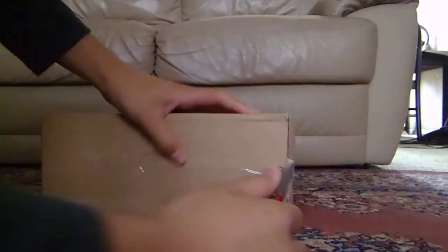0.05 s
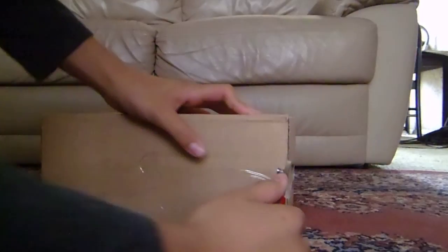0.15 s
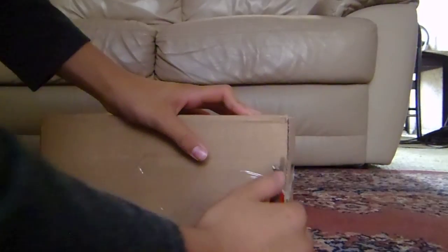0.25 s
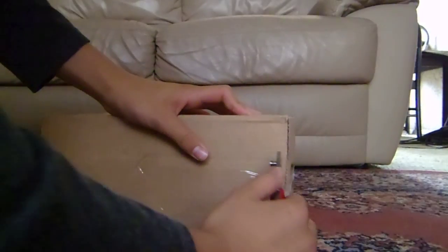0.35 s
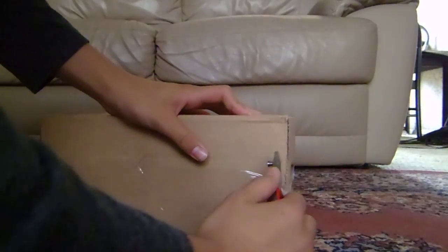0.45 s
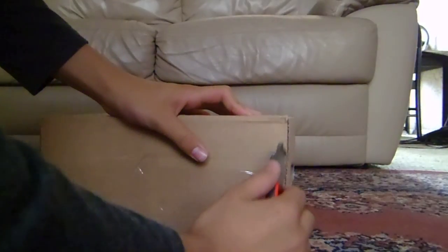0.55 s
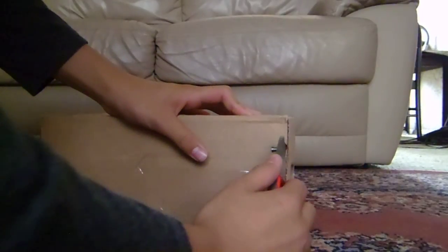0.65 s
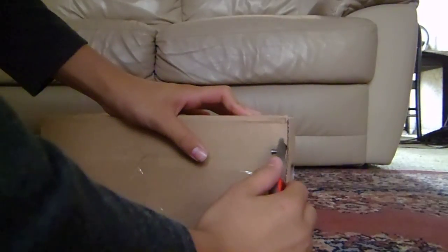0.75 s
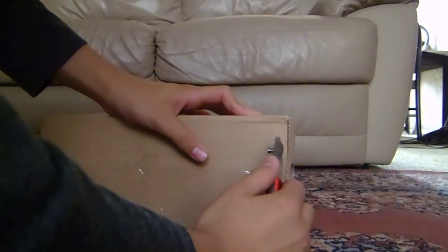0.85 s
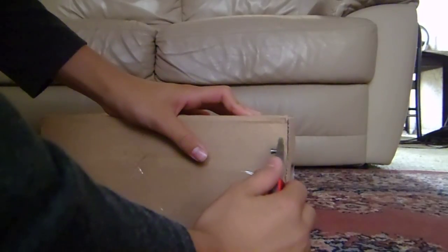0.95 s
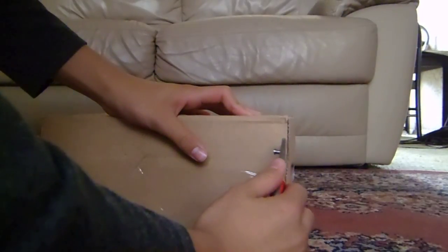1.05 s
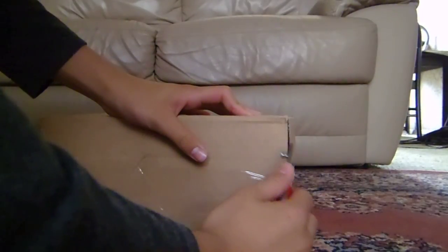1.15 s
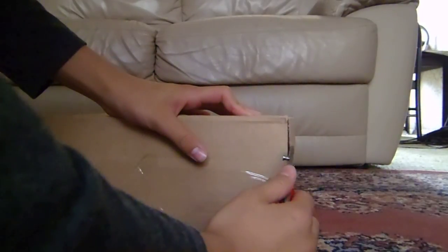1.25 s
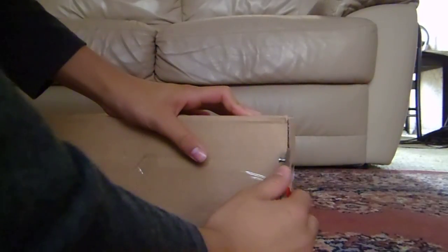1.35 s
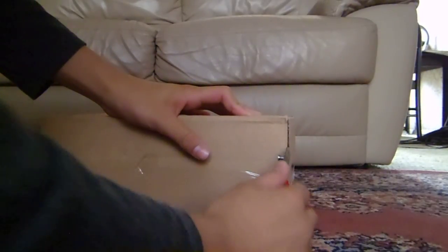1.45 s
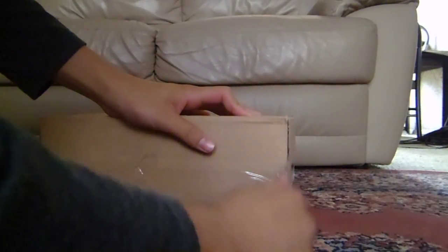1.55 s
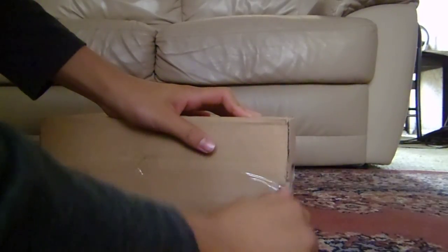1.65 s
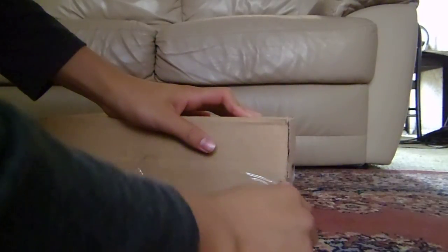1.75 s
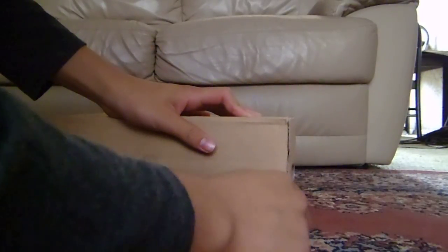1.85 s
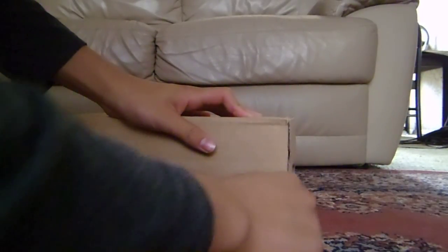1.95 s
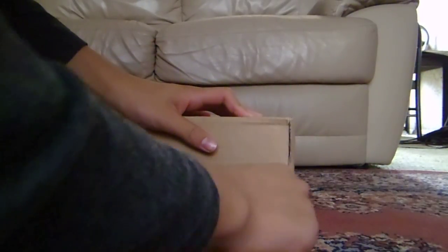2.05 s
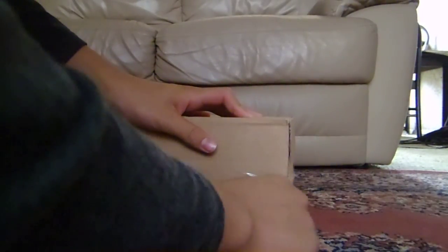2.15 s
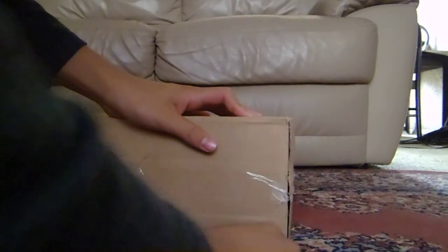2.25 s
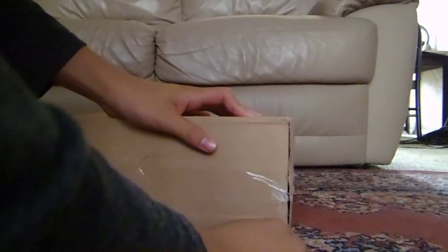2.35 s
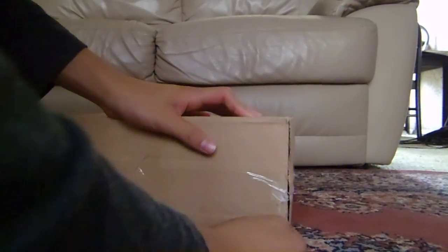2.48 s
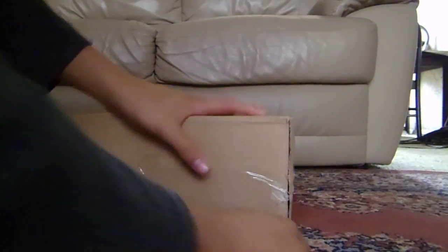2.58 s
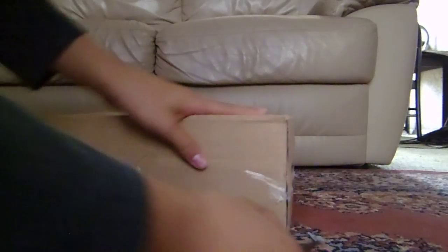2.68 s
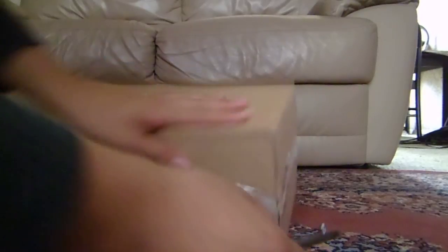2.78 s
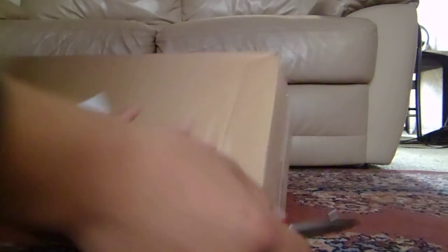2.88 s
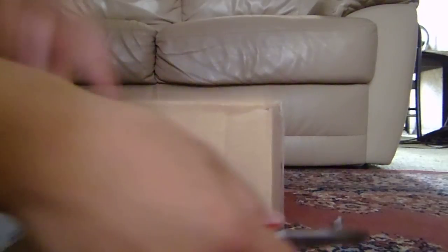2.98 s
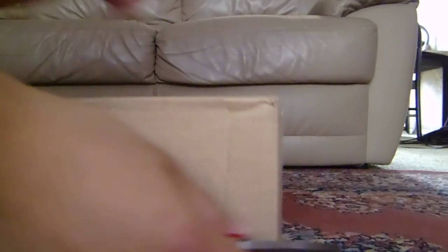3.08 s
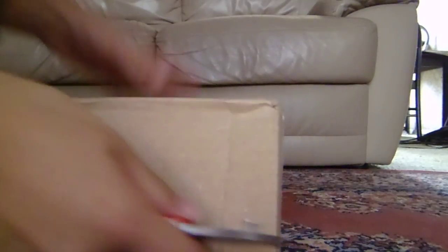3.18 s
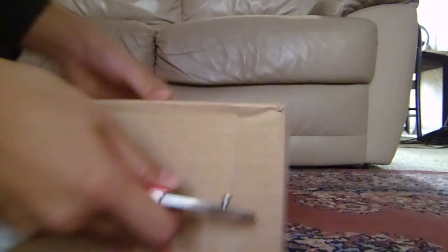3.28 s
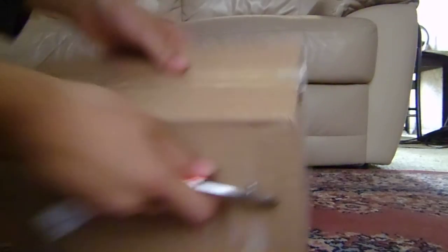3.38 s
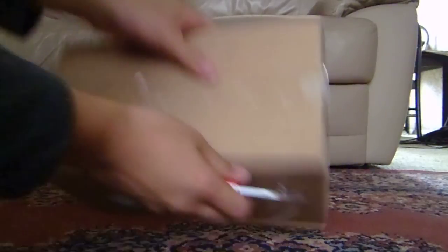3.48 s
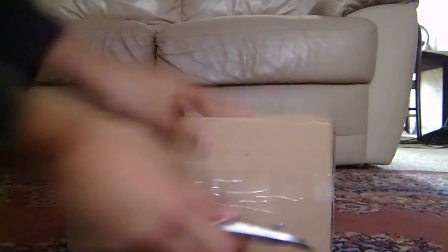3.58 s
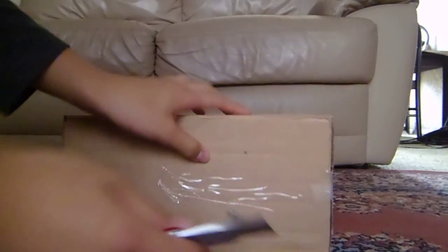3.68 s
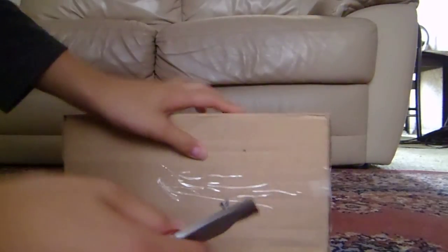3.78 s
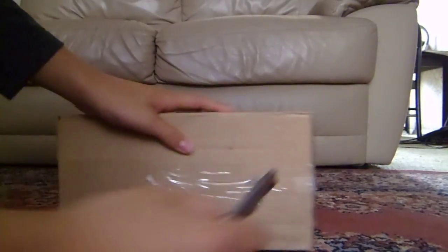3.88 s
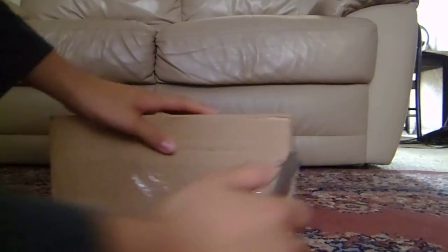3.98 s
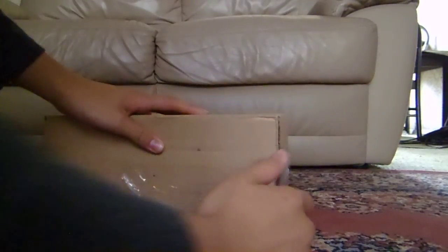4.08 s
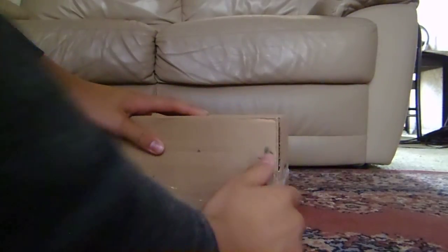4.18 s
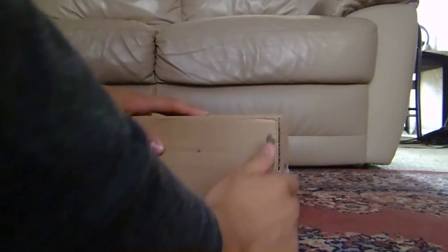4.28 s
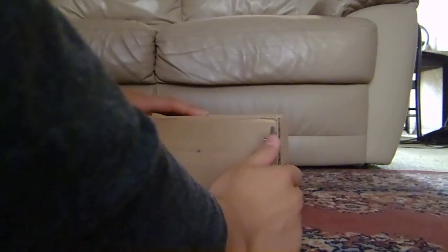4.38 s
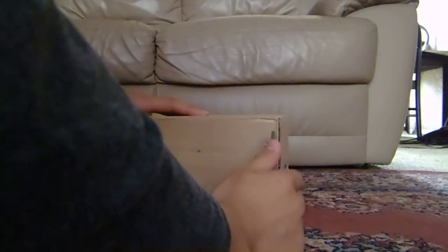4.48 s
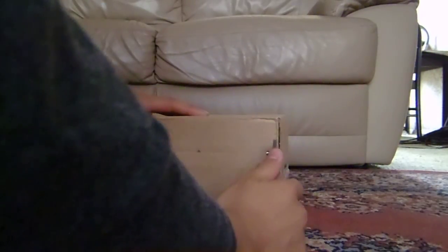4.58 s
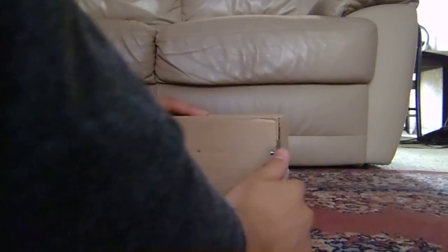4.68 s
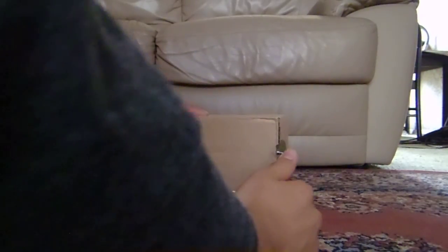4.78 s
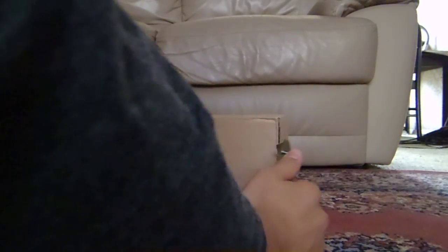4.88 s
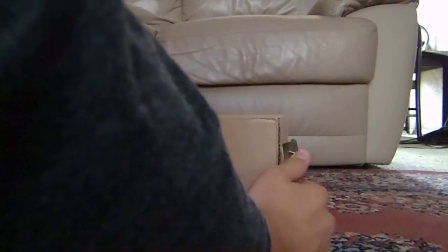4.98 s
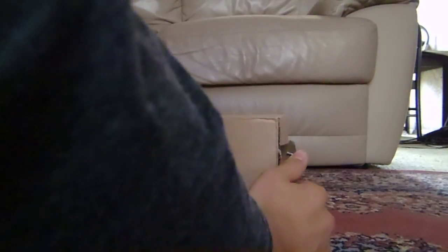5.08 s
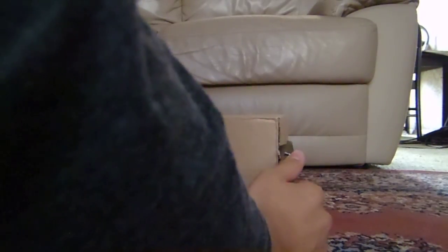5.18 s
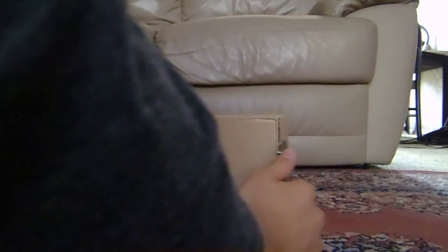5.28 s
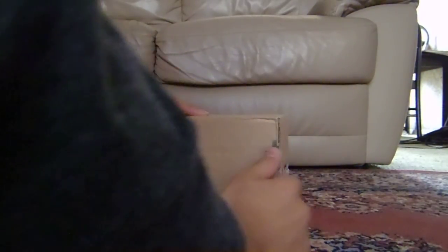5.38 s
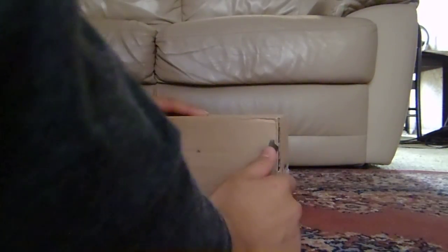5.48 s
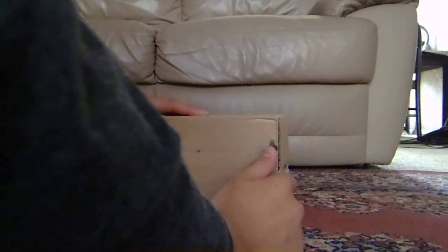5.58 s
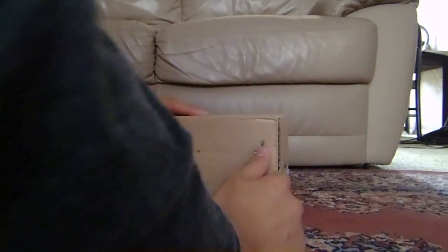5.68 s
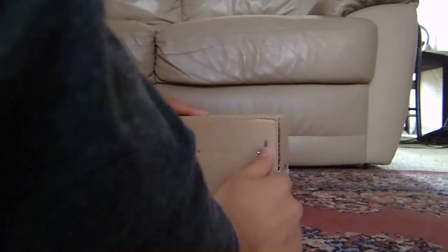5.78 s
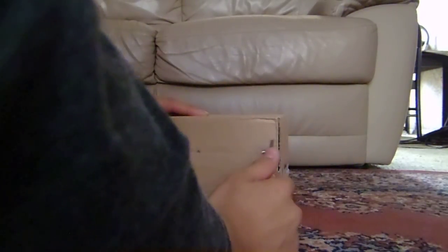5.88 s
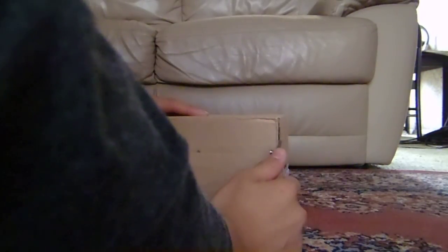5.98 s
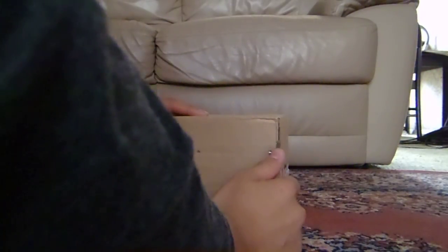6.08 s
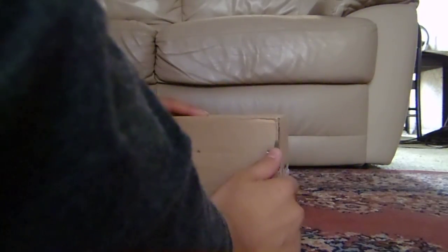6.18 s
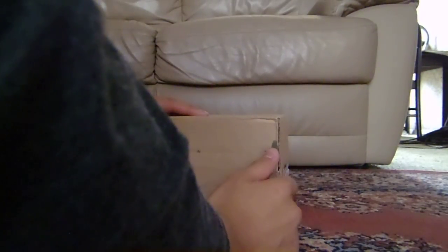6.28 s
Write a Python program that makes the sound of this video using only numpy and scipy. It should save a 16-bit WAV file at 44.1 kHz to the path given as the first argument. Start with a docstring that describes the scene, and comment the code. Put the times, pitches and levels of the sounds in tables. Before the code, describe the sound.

Hands and a small blade poke and tap a hollow cardboard box, flip it with loud hollow thuds, then resume faint picking over low hum.

```python
"""A cardboard box on a rug is turned and tapped by hands while a small knife pokes and slices its tape.
Each contact rings the hollow box's wall modes, with a low thump and a noisy snap; some contacts push an
extra low thump through the rug. Rubbing is gritty noise shaped by stroke pressure, and squeaks are short
narrow noise. Mains hum and microphone hiss fill the quiet room, and a slow gain control ducks after the
loud knocks."""
import sys
import numpy as np
from scipy import signal
from scipy.fft import rfft, irfft, next_fast_len
from scipy.io import wavfile
from scipy.ndimage import map_coordinates

SR = 44100
rng = np.random.default_rng(int(sys.argv[2]) if len(sys.argv) > 2 else 0)


def inscribe(sig):
    """Save sig as 16-bit PCM at rate SR to the path in sys.argv[1].

    A 1-D sig is mono; a 2-D sig holds one channel per row.
    Samples are clipped to [-1, 1] before scaling.
    """
    pcm = np.round(np.clip(np.atleast_2d(sig).T, -1, 1) * 32767)
    wavfile.write(sys.argv[1], SR, pcm.astype(np.int16))


N = 279898  # length [samples]

# All levels below are set ahead of the gain control.
# Contacts on the box: (time [s], ring peak level [dB], low pitch the struck spot favours [Hz],
# its boost [dB], high favoured pitch [Hz], its boost [dB], snap level relative to the ring [dB],
# hardness as ring tilt [dB per octave])
BOX_CONTACTS = [(0.017, -30.5, 339, 6, 1416, 9.5, -31, -1.5), (0.274, -46, 334, 7.5, 598, 16, -31, -9.5),
                (0.366, -37, 332, 6.5, 1846, 12, -24, -5.5), (0.427, -36, 339, 12, 1960, 14.5, -6, -1),
                (0.468, -41, 138, 10, 1195, 10, -26, -5), (0.534, -40, 136, 3.5, 1981, 6.5, -18.5, -1.5),
                (0.697, -32, 343, 7, 652, 9.5, -30, -2.5), (0.75, -48.5, 162, 3, 1766, 5, -33, -1.2),
                (0.768, -34.5, 156, 5, 1976, 9, -20.5, -1.5), (0.819, -44.5, 226, 3, 1870, 13, -9.5, -2.3),
                (0.926, -48.5, 242, 5, 2035, 11, -12, 1.2), (0.949, -41.5, 254, 5, 2067, 9, -29.5, -8),
                (0.956, -44, 246, 5, 1970, 8, -8.5, 7), (0.988, -39.5, 339, 10.5, 1497, 12.5, -21.5, 2.2),
                (1.103, -49.5, 194, 5, 840, 9, -18, 1.5), (1.123, -45.5, 140, 10.5, 1028, 14.5, -23.5, -3),
                (1.145, -40, 167, 4, 1394, 5, -20.5, -1.2), (1.168, -28.5, 328, 6, 1093, 5, -17, -4),
                (1.175, -26.5, 353, 6, 874, 13, -24, -1.5), (1.266, -46, 204, -1, 786, 21, -24, -8),
                (1.583, -29, 264, -0.6, 1658, 8, -32, -3), (1.589, -28, 161, -0.6, 1637, 5, -30, -3.5),
                (1.612, -33, 145, -0.6, 1384, 10.5, -25.5, -7),
                (1.639, -28, 142, -1.2, 1400, 4.5, -19, -1.5), (1.645, -23, 142, -1.2, 772, 3, -30, -5),
                (1.803, -44, 156, 4, 1117, 9, -34, -3.5), (2.101, -44.5, 339, 8.5, 910, 6, -28, -3),
                (2.143, -43, 172, 5, 1023, 7.5, -29, -2.2), (2.197, -20.5, 232, 1.2, 934, 5, -19, -1.5),
                (2.205, -22.5, 264, 6, 862, 11, -13, 3), (2.224, -31, 253, 3, 1500, 3.5, -12, 3.5),
                (2.271, -36.5, 141, 5, 594, 6.5, -24, -2.5),
                (2.543, -37.5, 231, 0.6, 1190, -0.6, -36, -4.5),
                (2.55, -37.5, 265, 8, 1028, 9.5, -27.5, 0.2), (2.651, -32, 266, 10.5, 700, 3, -33, -2.5),
                (2.679, -27.5, 140, -2.5, 1160, 10.5, -30.5, -6),
                (2.705, -33.5, 226, 3, 2169, 9, -31.5, -8.5), (2.789, -31, 151, 5, 2175, 12.5, -27, -8),
                (2.95, -25, 269, 1.5, 1160, 5, -34, -4), (2.956, -15, 269, 1.5, 800, 9, -34, -2.5),
                (2.97, -10.5, 253, 3, 483, 10.5, -27, -2.2),
                (3.036, -21.5, 161, -2.5, 468, 1.5, -27.5, -8.7), (3.043, -11.5, 141, 3, 610, 7, -24, 0.6),
                (3.055, -19.5, 140, 1.5, 1023, 10.5, -33, -3.5), (3.082, -27, 182, 5, 1647, 5.5, -29, -2.2),
                (3.169, -36, 248, 4.5, 1582, 11, -27, -4.5), (3.268, -32.5, 140, -1.2, 800, 6, -40, -4),
                (3.28, -24, 139, 5, 2126, 3, -31, -7), (3.296, -6, 210, 12, 700, 6, -24, -3.5),
                (3.346, -24.5, 215, 15, 2121, 5, -24, -6.5), (3.43, -36.5, 185, 5, 2500, 14, -1.5, 0.9),
                (3.467, -34.5, 368, 10.5, 560, 14.5, -34, -3.5), (3.485, -34, 167, -3, 877, 14, -31, -6.5),
                (3.614, -25.5, 231, 5, 1626, 11, -33, -7), (3.644, -27, 138, 4.5, 2094, 5.5, -35, -3.5),
                (3.654, -19, 140, 0.2, 883, 9.5, -34.5, -7.5), (3.932, -44, 244, 8, 1852, 15, -27, -9),
                (4.394, -43.5, 140, 3.5, 2143, 15, -17, -4), (4.423, -31.5, 143, 9, 2100, 10.5, -9, 2.3),
                (4.443, -38, 264, 8, 2126, 21, -34.5, -7.5),
                (4.763, -50.5, 151, 10.5, 1770, 29, -10.5, -5.3),
                (5.271, -51.5, 297, 5, 1152, 10.5, -24.5, -5.5),
                (5.36, -47.5, 221, -5, 668, 7, -16.5, -2.3), (5.381, -36, 148, 11.5, 696, 14, -19, 0.6),
                (5.561, -33.5, 266, 8.5, 690, 9, -20.5, 3.5), (5.681, -25.5, 140, -6, 992, 4.5, -16, 1.5),
                (5.704, -40, 140, 7.5, 1700, 15, -11, -1.5), (5.85, -44, 159, 18, 1800, 21, -9, 0.6),
                (6.14, -42.5, 172, 5, 684, 14.5, -9, -1.5)]
# Resonant modes of the cardboard walls: (frequency [Hz], level [dB])
WALL_MODES = [(120.8, -11), (150.3, -6), (214.3, -4), (264.4, -2), (341, -1.5), (481.4, -0.5), (603, 1.5),
              (680, -1.5), (822.4, 2), (1019, -1.5), (1140, -2), (1366, 0.5), (1825, -3.5), (1610, -10.5),
              (2030, -6), (2230, -16.5), (2500, -14.5), (2850, -20), (3270, -13)]
# Short narrow squeaks of blade and tape: (time [s], length [s], pitch [Hz], level before envelope [dB])
BLADE_SQUEAKS = [(0.369, 0.035, 1950, -60), (0.443, 0.031, 2920, -64), (0.557, 0.02, 3160, -63),
                 (0.926, 0.065, 2190, -70), (1.562, 0.025, 5300, -65), (4.336, 0.06, 3400, -66.5),
                 (4.342, 0.066, 530, -66.5), (4.763, 0.01, 1770, -54), (5.044, .03, 900, -65),
                 (5.225, 0.043, 1135, -68.5), (5.269, .02, 720, -60), (5.472, 0.077, 627, -62),
                 (5.69, 0.023, 3380, -62), (6.135, 0.033, 765, -59.5), (6.266, 0.086, 700, -67.5)]
# Spectrum of scraping heard through the walls: (frequency [Hz], density [dB per Hz])
SCRAPE_SPECTRUM = [(150, -37.5), (250, -11.5), (319, -3.5), (431, -9), (590, -9.5), (1120, -12.5),
                   (1230, -13.5), (1310, -16), (2060, -19), (4000, -35), (5200, -65.5), (8800, -120)]
# Spectrum of the box dragging on the rug: (frequency [Hz], density [dB per Hz])
DRAG_SPECTRUM = [(20, -19), (60, -16), (130, -8), (220, -4.5), (320, -8.5), (500, -37)]
# Spectrum of tape and skin fizz: (frequency [Hz], density [dB per Hz])
FIZZ_SPECTRUM = [(1060, -17.5), (1800, -19), (2390, -14.5), (2580, -12.5), (2780, -8), (3300, -2.5),
                 (4150, -8), (4960, -3.5), (7360, -9), (8670, -27), (11300, -55), (19100, -120)]
# Spectrum of the microphone hiss: (frequency [Hz], density [dB per Hz])
HISS_SPECTRUM = [(20, 2.5), (60, 1.5), (130, -3), (300, -10.5), (700, -15.5), (1500, -19.5), (3000, -26),
                 (5500, -31.5), (7300, -26), (7900, -41), (8800, -52.5)]
# Spectrum of a contact's snap before its tilt: (frequency [Hz], level [dB])
SNAP_SPECTRUM = [(500, -28.5), (1200, -10), (2000, -5), (3500, 0), (4200, -6.5), (5200, -3.5), (7300, -6),
                 (8000, -18), (8800, -30.5)]
# Extra low thumps, mostly at the moment of a contact, as the box lands or rocks on the rug:
# (time [s], pitch [Hz], level before envelope [dB])
EXTRA_THUMPS = [(1.587, 108, -37), (1.641, 65, -36), (2.2, 59, -42), (2.274, 54, -46), (2.651, 97, -33.5),
                (2.679, 97, -36), (3.036, 118, -28), (3.043, 118, -27), (3.169, 27, -31), (3.28, 54, -18),
                (3.296, 118, -23), (3.614, 59, -35.5), (3.644, 65, -19.5), (3.654, 118, -28),
                (3.932, 32, -44), (4.394, 113, -38), (5.85, 108, -50)]
# Strokes of hand, blade or box: (time of full strength [s], hold [s], scrape on the walls [dB],
# rug drag [dB], tape and skin fizz [dB])
RUB_STROKES = [(0, .03, -52, -42, -63), (.08, .04, -57, -56, -71), (.2, .04, -62, -70, -76),
               (.45, .08, -64, -55, -72), (.75, .03, -63, -55, -77), (.83, .04, -59, -59, -73),
               (1.14, .09, -60, -65, -73), (1.3, .12, -58.5, -68, -73), (1.555, .02, -50, -58, -69),
               (1.6, .07, -54, -43, -68), (1.99, .02, -57, -48, -73), (2.04, .025, -53, -60, -68),
               (2.225, .02, -47, -47, -63), (2.47, .03, -59, -59, -74), (2.59, .11, -55, -60, -72),
               (2.74, .11, -52.5, -59, -63.5), (2.925, .03, -49.5, -50, -70), (3, .02, -47, -48, -70),
               (3.065, .01, -43, -31, -68), (3.1, .04, -45.5, -54, -63), (3.32, .02, -41, -45, -63),
               (3.355, .045, -51, -41, -61), (3.62, .03, -53, -39, -69), (3.69, .03, -57, -48, -73),
               (3.76, .02, -60, -52, -78), (3.86, .14, -62, -59, -73), (4.05, .05, -63, -58, -73),
               (4.19, .06, -67, -75, -75), (4.52, .08, -58.5, -57, -78), (5.69, .035, -60, -68, -68)]
# Hands resting and shifting on the box between strokes: (time [s], scrape level [dB])
HAND_SHIFTING = [(0, -66), (.6, -67), (1.05, -69), (1.75, -64), (2.4, -65), (3.2, -66), (3.75, -66),
                 (4.28, -75), (4.45, -68), (4.75, -78), (5.3, -77), (5.6, -70), (6.35, -72)]
# How fast strokes swell and die, in the order scrape, drag, fizz: [dB per s]
RISE_DB_PER_S = [260, 300, 240]
FALL_DB_PER_S = [250, 300, 380]

HUM_HZ = 99.7  # centre of a slightly wandering pitch
TOP_HZ = 8823  # band limit
REF_DB = -35  # contact level at which the ring, press and snap tilt settings hold
RING_T60_S, DAMPED_PER_DB = .062, .012  # at 300 Hz; heavier blows hold the wall and shorten its ring
CONTACT_S, LONGER_S_PER_DB = .0015, .00002  # heavier blows press longer
SNAP_T60_S, SHORTER_PER_DB = .05, .035  # at a snap of -25 dB; strong snaps die sooner
SNAP_TILT_DB, DULLER_PER_DB = -3, .22  # per octave; heavier blows snap duller
THUMP_HZ, THUMP_DB = 112, -21  # the floor under every contact, relative to its ring
IDLE_SCRAPE_DB = -65  # scrape at which the resting drag and fizz levels hold
DRAG_DB, DRAG_FOLLOWS = -65, .45  # resting level; dB per dB of scrape
FIZZ_DB, FIZZ_FOLLOWS = -74.5, .3  # resting level; dB per dB of scrape


def amp(db):
    """Gain of a level in dB."""
    return 10 ** (np.asarray(db) / 20)


def unit(x):
    """x at rms 1."""
    return x / np.sqrt(np.mean(x ** 2) + 1e-20)


def wobble(rate):
    """A smooth random curve, rate knots a second."""
    knots = rng.standard_normal(int(N * rate / SR) + 4)
    return map_coordinates(knots, [np.arange(N) * rate / SR])


def coloured(x, points):
    """x shaped by a spectrum of (frequency [Hz], level [dB]) points on a log axis."""
    m = next_fast_len(len(x) + 4096)
    f, level = np.transpose(points)
    bins = np.fft.rfftfreq(m, 1 / SR)
    db = np.interp(np.log(bins + 1), np.log(f + 1), level, right=-120)
    return irfft(rfft(x, m) * amp(db), m)[:len(x)]


def grit(rate, spread_db, share):
    """Steady noise plus sparse slips of uneven size, rate a second; share is the slips' part of the power."""
    happens = rng.random(N) < rate / SR
    size = amp(spread_db * np.minimum(rng.exponential(size=N), 4))
    slips = happens * size * rng.standard_normal(N)
    share = np.clip(share, 0, 1)
    return np.sqrt(share) * unit(slips) + np.sqrt(1 - share) * rng.standard_normal(N)


def room_tone():
    """A mains hum, slightly unsteady in pitch and level, over broad microphone hiss."""
    phase = 2 * np.pi * np.cumsum(HUM_HZ + 0.42 * wobble(2.5)) / SR
    hum = amp(-45.5 + 0.25 * wobble(6.1)) * np.sin(phase)
    hiss = amp(-62) * unit(coloured(rng.standard_normal(N), HISS_SPECTRUM))
    return hum + hiss


def pressure_db():
    """Levels of scrape, drag and fizz: every stroke rises, holds and falls over the shifting hands."""
    t = np.arange(0, N, 64) / SR
    idle_db = np.interp(t, *np.transpose(HAND_SHIFTING))
    idle_drag_db = DRAG_DB + DRAG_FOLLOWS * (idle_db - IDLE_SCRAPE_DB)
    idle_fizz_db = FIZZ_DB + FIZZ_FOLLOWS * (idle_db - IDLE_SCRAPE_DB)
    power = amp([idle_db, idle_drag_db, idle_fizz_db]) ** 2
    for s, hold, *top_db in RUB_STROKES:
        before_db = np.outer(RISE_DB_PER_S, np.maximum(s - t, 0))
        after_db = np.outer(FALL_DB_PER_S, np.maximum(t - s - hold, 0))
        power += amp(np.array(top_db)[:, None] - before_db - after_db) ** 2
    return [np.interp(np.arange(N) / SR, t, 10 * np.log10(p)) for p in power]


def rubbing():
    """Skin, blade and rug slip along the cardboard in uneven grains."""
    scrape_db, drag_db, fizz_db = pressure_db()
    flutter = wobble(35)  # one uneven stroke drives all three
    scrape_db = scrape_db + 2.2 * flutter
    drag_db = drag_db + 1.4 * flutter + 2.1 * wobble(20)
    fizz_db = fizz_db + 1.5 * flutter + 1.2 * wobble(60)
    scrape = amp(scrape_db) * unit(coloured(grit(650, 2.5, .35), SCRAPE_SPECTRUM))
    drag = amp(drag_db) * unit(coloured(grit(250, 2.2, .25), DRAG_SPECTRUM))
    fizz = amp(fizz_db) * unit(coloured(grit(2500, 2.2, .3), FIZZ_SPECTRUM))
    return scrape + drag + fizz


def thump(hz, t):
    """One low push through the rug into the floor: a decaying sine with a soft onset."""
    return np.sin(2 * np.pi * hz * t) * amp(-60 * t / 0.13) * (1 - np.exp(-t / 0.001))


def favoured(hz, spot_hz):
    """How strongly a struck spot drives each mode: a bell over log pitch."""
    return np.exp(-(np.log2(hz / spot_hz) / 0.22) ** 2)


def wall_ring(t, db, low_hz, low_db, high_hz, high_db, hard_db):
    """The hollow box's modes ring by the struck spot and the blow's hardness; high modes die sooner."""
    hz, level = np.transpose(WALL_MODES)[..., None]
    near_low = favoured(hz, low_hz)
    spot_db = low_db * near_low + high_db * favoured(hz, high_hz) + hard_db * np.log2(hz / 300)
    t60 = RING_T60_S * np.exp(-DAMPED_PER_DB * (db - REF_DB)) * (300 / hz) ** .75
    t60 = t60 * (1 + 0.041 * max(low_db, 0) * near_low)  # a wall left free rings on
    level_chance, pitch_chance, phase_chance = rng.standard_normal((3, len(WALL_MODES), 1))
    phase = 2 * np.pi * hz * (1 + .015 * pitch_chance) * t + 1.53 * phase_chance
    mode_db = level + spot_db + 1.6 * level_chance - 60 * t / t60
    return (amp(mode_db) * np.sin(phase)).sum(0)


def snap_noise(t, db, snap_db):
    """A sharp crack and a crackling tail: noise with a stepped random level, duller for heavy blows."""
    steps_db = 3.6 * rng.standard_normal(len(t) // 32 + 1).repeat(32)[:len(t)]
    crackle = rng.standard_normal(len(t)) * amp(steps_db)
    tilt_db = SNAP_TILT_DB - DULLER_PER_DB * (db - REF_DB)
    colour = [(f, v + tilt_db * np.log2(f / 3500)) for f, v in SNAP_SPECTRUM]
    tail_t60 = SNAP_T60_S * np.exp(-SHORTER_PER_DB * (snap_db + 25))
    fade = amp(-60 * t / 0.013) + .5 * amp(-60 * t / tail_t60)
    return unit(coloured(crackle, colour)) * fade


def knocks():
    """Each contact rings the walls, thumps the floor and snaps; some push an extra thump through the rug."""
    out = np.zeros(N + SR)
    t = np.arange(SR // 4) / SR
    for s, db, low_hz, low_db, high_hz, high_db, snap_db, hard_db in BOX_CONTACTS:
        contact = max(CONTACT_S + LONGER_S_PER_DB * (db - REF_DB), .0002)
        rise = 1 - np.exp(-(t / contact) ** 2)  # the force builds over the contact
        ring = wall_ring(t, db, low_hz, low_db, high_hz, high_db, hard_db) * rise
        snap = snap_noise(t, db, snap_db) * np.sqrt(rise)
        blow = ring / abs(ring).max() + amp(THUMP_DB) * thump(THUMP_HZ, t) + amp(snap_db) * snap
        out[round(s * SR):][:len(t)] += amp(db) * blow
    for s, thump_hz, db in EXTRA_THUMPS:
        out[round(s * SR):][:len(t)] += amp(db) * thump(thump_hz, t)
    return out[:N]


def room(x):
    """A short soft-furnished tail: delayed, decaying shaped noise at unit energy."""
    t = np.arange(SR // 3) / SR
    colour = [(60, -5), (400, -5), (2000, -3), (8000, -2)]
    tail = coloured(rng.standard_normal(len(t)), colour) * amp(-60 * t / 0.2)
    delayed = np.pad(x, (300, 0))  # samples
    return signal.fftconvolve(delayed, tail / np.linalg.norm(tail))[:N]


def squeaks():
    """Stick-slip held near one pitch: narrow noise under a quick rise and a fall."""
    out = np.zeros(N + SR)
    for s, length, hz, db in BLADE_SQUEAKS:
        u = np.arange(round(length * SR)) / (length * SR)  # progress from 0 to 1
        band = [(hz * .7, -60), (hz * .9, -8), (hz, 0), (hz * 1.1, -8), (hz * 1.5, -45)]
        noise = unit(coloured(rng.standard_normal(len(u)), band))
        out[round(s * SR):][:len(u)] += amp(db) * np.sin(np.pi * u ** .6) * noise
    return out[:N]


def scene():
    """The box close to the microphone, its knocks and squeaks answered by the room."""
    hits = knocks() + squeaks()
    return (hits + amp(-14) * room(hits) + rubbing() + room_tone())[None]


def record(dry):
    """Gain control turns down with recent loudness and recovers over seconds; a band limit cuts the top."""
    keep = np.exp(-1 / (1.5 * SR))  # 1.5 s averaging
    loudness = np.sqrt(signal.lfilter([1 - keep], [1, -keep], dry ** 2))
    x = dry / (1 + loudness / amp(-21.5))
    m = next_fast_len(N + SR)
    passed = np.fft.rfftfreq(m, 1 / SR) < TOP_HZ
    return irfft(rfft(x, m) * passed, m)[..., :N]


dry = scene()
out = record(dry)
inscribe(out)
```